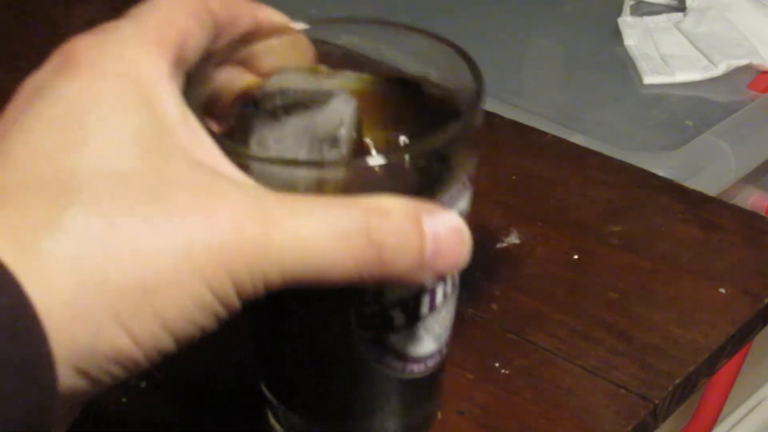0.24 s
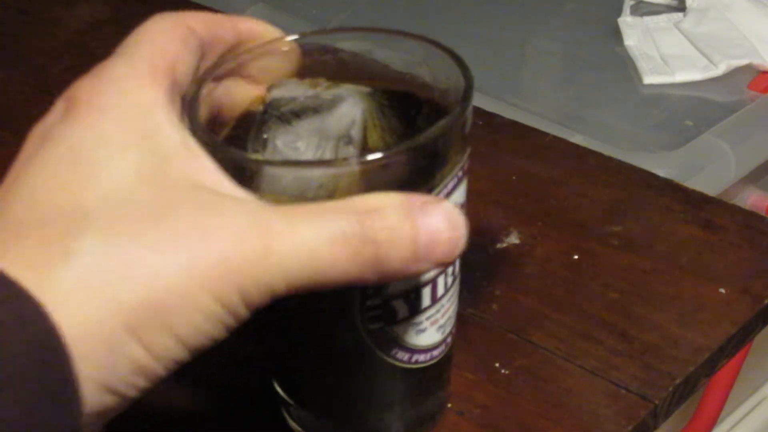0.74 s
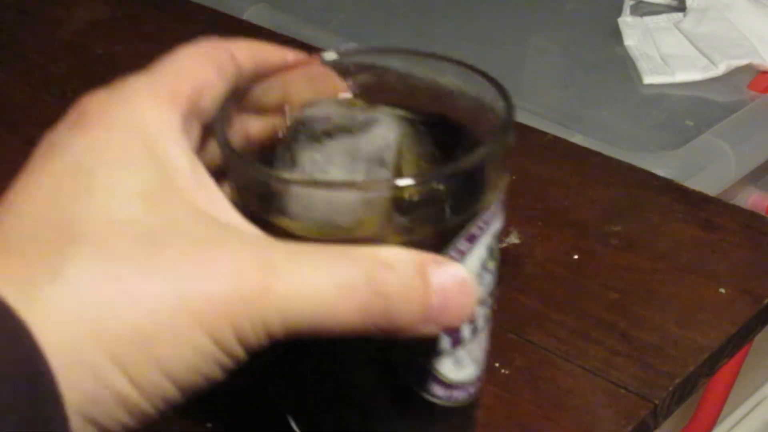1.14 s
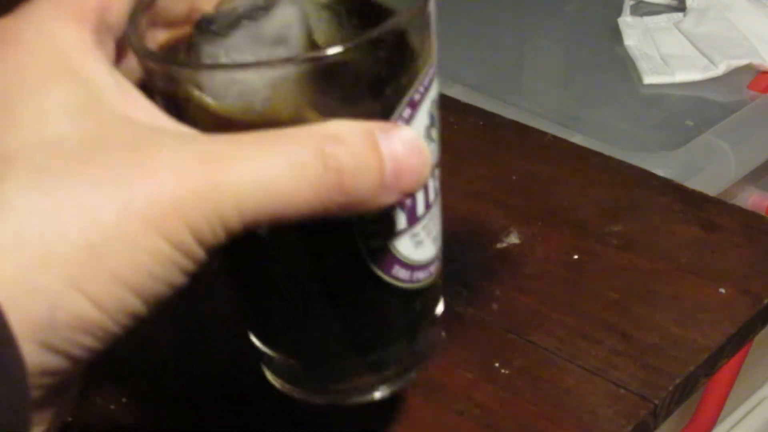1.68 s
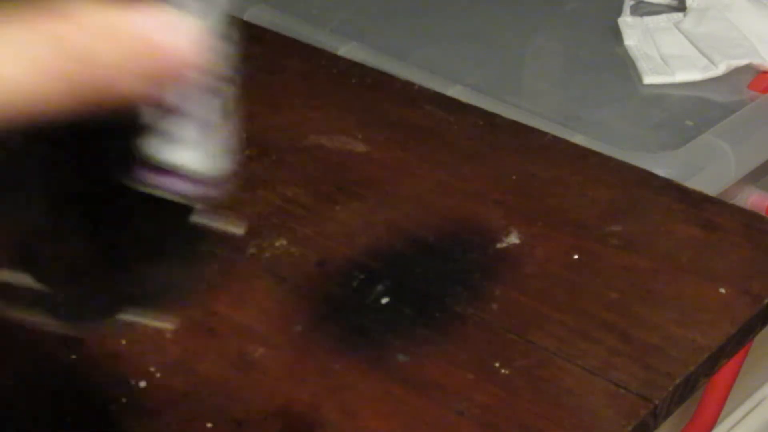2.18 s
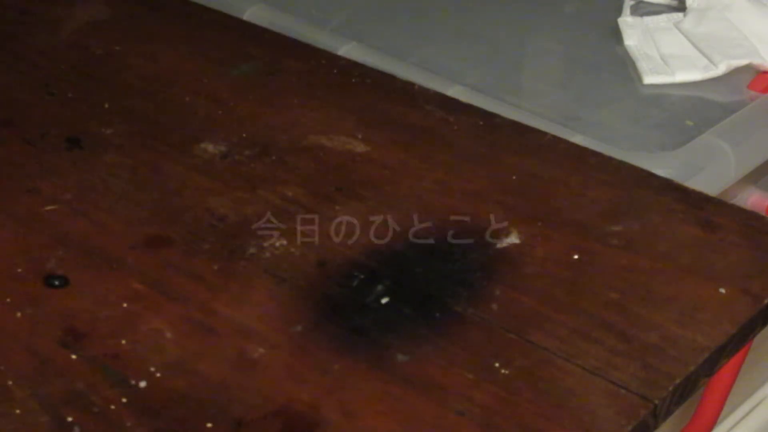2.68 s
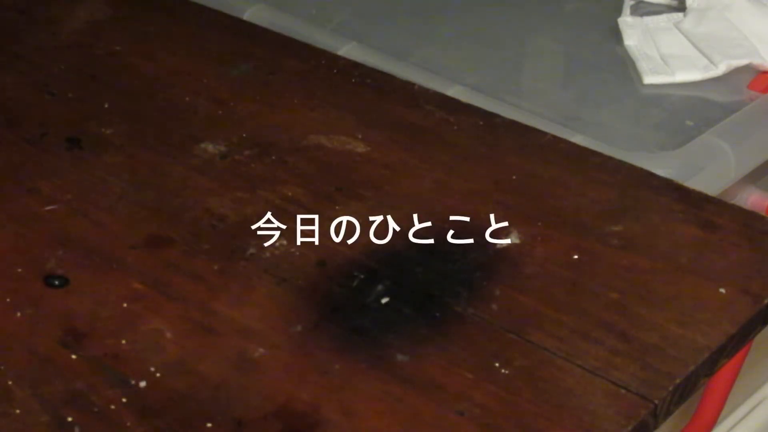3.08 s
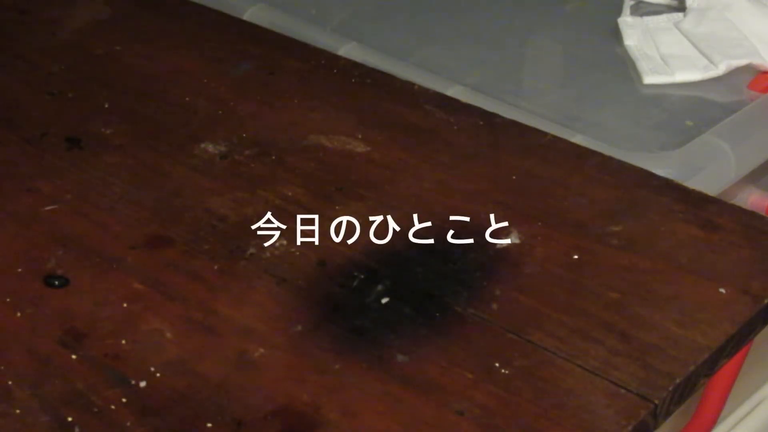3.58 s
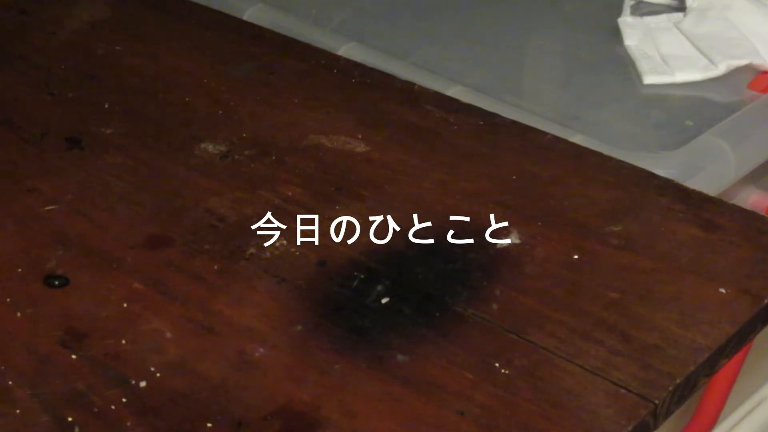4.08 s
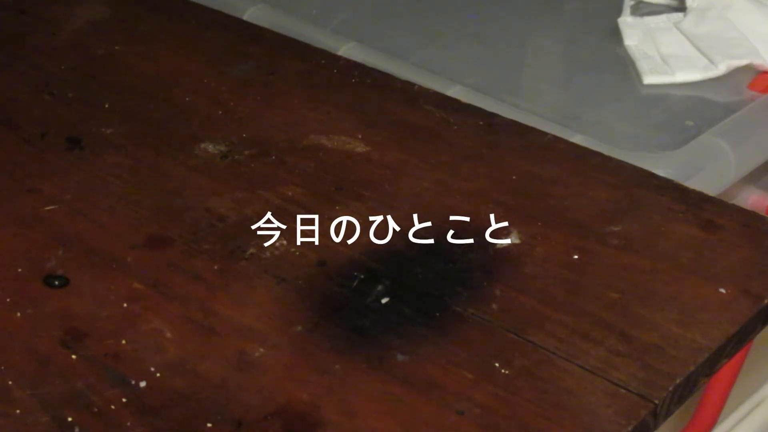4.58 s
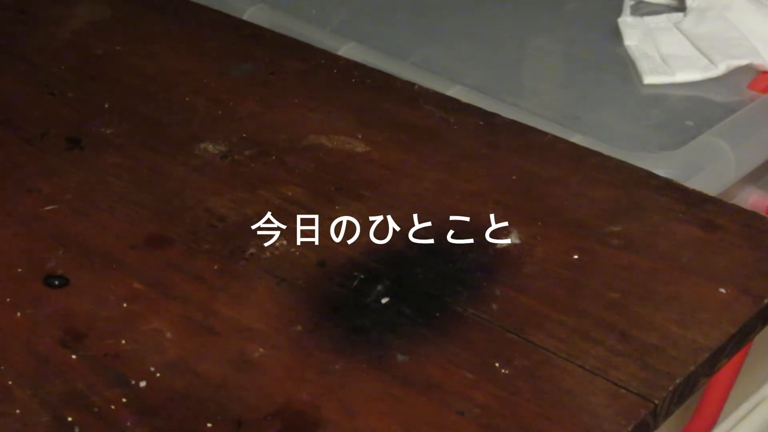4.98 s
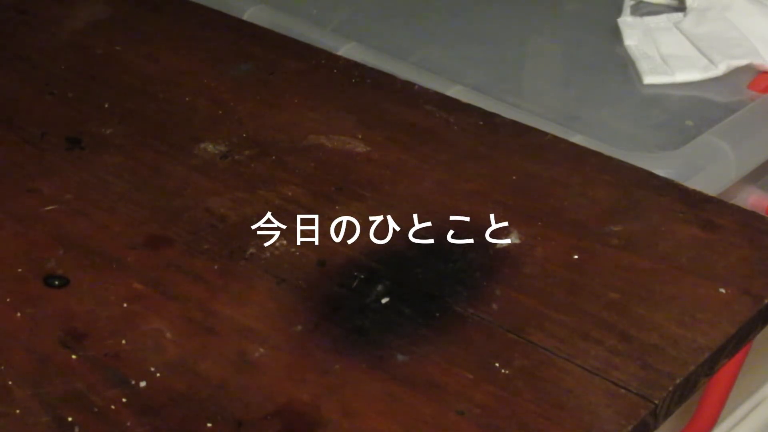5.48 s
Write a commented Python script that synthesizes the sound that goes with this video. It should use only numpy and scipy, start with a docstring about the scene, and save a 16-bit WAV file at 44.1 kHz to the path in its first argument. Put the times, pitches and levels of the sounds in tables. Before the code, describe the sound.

Very close to a small microphone, ice cubes clink briefly in a drinking glass, its heavy base bumps down on a wooden table, and after a short pause the ice rattles longer and louder as the glass is lifted. Then mostly a low motor hum, soft hiss and faint crackles in a small dry room, with one tiny clink and a clear double clink at the end.

```python
"""Ice cubes clink close by in a hand-held glass of drink while a motor hums: a rattle, the glass bumps a wooden
table, a longer rattle as it is lifted away, a faint clink later and a louder double one near the end. The ice and
glass are damped rings struck by a grinding contact, the table a set of wood modes. The motor, two sines, slowly
loses speed. Shaped noise makes the small room's rumble and hiss; short snaps crackle faintly, with a few soft taps
and a thin far ping."""
import sys
import numpy as np
from scipy import signal
from scipy.fft import rfft, irfft
from scipy.io import wavfile
from scipy.ndimage import uniform_filter1d, map_coordinates

SR = 44100
rng = np.random.default_rng(int(sys.argv[2]) if len(sys.argv) > 2 else 0)


def pcm_store(signal):
    """Save signal as 16-bit PCM."""
    levels = np.round(np.clip(np.atleast_2d(signal), -1, 1) * 32767)
    wavfile.write(sys.argv[1], SR, levels.astype(np.int16).T)


def gain_from_db(level_db):
    """Convert decibel levels to linear amplitude factors (20 dB per decade)."""
    decades = np.asarray(level_db, float) / 20
    return 10 ** decades


N = 253134  # length in samples


def unit(x):
    """Scaled to rms 1."""
    return x / np.sqrt(np.mean(x ** 2) + 1e-20)


def along(points, hz):
    """(Hz, value) points read on a log frequency axis."""
    f, v = np.transpose(points)
    return np.interp(np.log(hz + 1), np.log(f + 1), v)


def curves(rows):
    """One value per sample for each column after the time in seconds."""
    s, *cols = np.transpose(rows)
    return [np.interp(np.arange(N) / SR, s, c) for c in cols]


def wobble(rate):
    """A smooth random curve, rate knots a second."""
    knots = rng.standard_normal(int(N * rate / SR) + 4)
    return map_coordinates(knots, [np.arange(N) * rate / SR])


def add(track, s, sound):
    """Mix a sound into the track at time s."""
    part = track[round(s * SR):][:len(sound)]
    part += sound[:len(part)]


def ring(hz, db, t60, attack):
    """Sum of damped sines, a fifth of a second long; t60 and the attack's time constant in s."""
    t = np.arange(SR // 5) / SR
    hz, db, t60 = (np.reshape(v, (-1, 1)) for v in (hz, db, t60))
    sines = gain_from_db(db - 60 * t / t60) * np.sin(2 * np.pi * hz * t)
    return sines.sum(axis=0) * (1 - np.exp(-t / attack))


def contact(grind_db, t60):
    """A sharp blow followed by a short grinding shudder of the two surfaces."""
    t = np.arange(SR // 20) / SR
    force = gain_from_db(grind_db - 60 * t / t60) * rng.standard_normal(len(t))
    force[0] = 1
    return force


def clinks():
    """Each cube strikes another spot, so the ring families change strength; the sloshing drink shifts the low pair."""
    # Ice on glass. Each row: start in seconds, strength in dB, low ring in Hz, then the ice knock
    # and the upper rings in dB against the low ring family.
    strikes = [(0.0514, -26.5, 2270, 2.5, -21), (.0554, -20.5, 2300, -5, -12),
               (0.075, -21, 2080, -8.5, -12.5), (0.0825, -22, 1860, -9, -26), (0.091, -27, 2200, -5, -13),
               (0.1195, -23, 2200, -1.5, -12), (0.1702, -35, 2080, 6, -3), (.2189, -40, 2220, -7, -14),
               (0.2707, -24, 2150, -5, -9), (.2784, -24, 2210, -6.5, -22), (0.2912, -29.5, 2140, -12, -3),
               (0.2967, -36, 1900, 2, -18), (.3322, -28, 2170, -3.5, -11.5), (.3654, -41, 2080, -5, -8),
               (0.4553, -40.5, 2190, -4, -8), (1.0205, -40, 2207, -20, -6.5), (1.032, -37, 2000, -7, -6),
               (1.064, -26.5, 2150, -7.5, -13), (1.1051, -29.5, 2030, -8.5, -10),
               (1.1104, -30, 2180, -21, -10), (1.2261, -45, 2210, -14, -9), (1.278, -46, 2360, -12, -2),
               (1.328, -35, 2200, 0, -7), (1.3848, -43, 2360, -5, -1), (1.4005, -21.5, 2080, -11, -14.5),
               (1.4114, -36, 2260, -14, -19), (1.4488, -22.5, 2200, -5.5, -13),
               (1.464, -27, 2130, -11, -12), (1.4785, -27, 2120, -9, -13), (1.5032, -27.5, 2080, -6, -14),
               (1.521, -31, 2020, -6, -22), (1.544, -31, 2100, -6, -6), (1.57, -35, 2130, -12, -23),
               (1.5843, -25.5, 2080, -16, -14), (1.595, -32, 2080, -10, -12), (1.6162, -28, 2200, -6, -15),
               (1.6795, -24.5, 2200, -5, -18), (1.697, -43, 2000, -3, -4), (1.7116, -27, 2112, -10, -13),
               (1.73, -31, 2040, -10, -22), (1.739, -32, 2100, -20, -20), (1.744, -28, 2110, -4, -8),
               (1.7644, -25, 2140, -8, -19), (1.7706, -15.5, 2090, -10.5, -14.5),
               (1.7804, -32, 2060, -24, -22), (1.7864, -32, 2155, -16, -15), (1.7957, -37, 2261, -11, -11),
               (1.8362, -26, 2150, -20, -26), (1.8501, -12.5, 2140, -1, -5.5),
               (1.8575, -24, 2110, -20, -11), (1.8644, -32, 2070, -9, -2), (1.8795, -31, 2010, -8, -7),
               (1.892, -31, 2200, -13, -19), (1.8984, -33, 2070, -7, -12), (1.9146, -33, 2022, -7, -13),
               (1.9258, -26, 2150, -8, -15.5), (2.6919, -41, 2140, -3, -10), (5.5356, -22, 2290, -6.5, -14),
               (5.542, -32, 2420, -5, -26)]
    # The damped glass and its ice. Each row: mode in Hz, relative level in dB, t60 in seconds.
    glass_modes = [(1053, -20, 0.021), (1266, -18.5, 0.021), (1466, -15, 0.015), (1740, -12, 0.018),
                   (2080, 2, 0.018), (2200, -5.5, 0.022), (2576, 2, 0.013), (2804, 8.5, 0.0072),
                   (3073, 8.5, 0.0088), (3310, 4, 0.0058), (3560, 3, 0.012), (3810, -0.5, 0.0073),
                   (4080, -0.5, 0.014), (4710, 1, 0.0048), (4870, 6.5, 0.014), (5090, -1, 0.032),
                   (5350, -8, 0.012), (6200, 2.5, 0.0083), (6400, -25, 0.0112), (6800, -10, 0.016),
                   (7650, -13, 0.008), (8010, -7, 0.0099), (8000, -36, 0.011), (8800, -3, 0.012),
                   (8750, -10, 0.011), (11600, -17.5, .01)]
    # Ring families in Hz: low ring, low ice knock, high ice knock, upper rings (and all above).
    families_hz = [2150, 2950, 3900, 5000]
    high_knock_db, high_grows = -1, 1.94  # the high ice knock follows the low one, swinging wider
    hz, db, t60 = np.transpose(glass_modes)
    rows = np.vstack([strikes, nudges()])
    chance = rng.standard_normal((len(rows), 2, len(hz)))
    out = np.zeros(N)
    for (s, strength_db, low_hz, knock_db, upper_db), (level, detune) in zip(rows, chance):
        family_db = [0, knock_db, high_grows * knock_db + high_knock_db, upper_db]
        mode_db = db + strength_db + along(list(zip(families_hz, family_db)), hz)
        pitch = hz * (1 + .012 * detune)
        pitch[4:6] = hz[4:6] * low_hz / hz[4]  # the low pair moves together
        rings = ring(pitch, mode_db + 1.5 * level, t60, attack=.0004)
        add(out, s, signal.fftconvolve(rings, contact(grind_db=-25, t60=.025)))
    return out


def nudges():
    """The hand swirls the glass and cubes nudge the wall faintly: rows like those of the clinks, at random moments."""
    # Swirls of the glass. Each row: start in seconds, end in seconds.
    swirl_spans = [(.05, .47), (.98, 1.14), (1.19, 1.94)]
    per_s = 30
    s = np.concatenate([rng.uniform(a, b, round(per_s * (b - a))) for a, b in swirl_spans])
    size, slosh, knock, upper = rng.standard_normal((len(s), 4)).T
    strength_db = -48.5 + 4.5 * size
    low_hz = 2150 * (1 + 0.067 * slosh)
    return np.transpose([s, strength_db, low_hz, -7 + 4 * knock, -13 + 4 * upper])


def table_bumps():
    """The heavy base lands, rocks and bounces; a softer contact drives fewer high modes and a duller crunch."""
    # Glass base on the table top. Each row: start in seconds, blow in dB, softness corner in Hz (lower = softer).
    blows = [(.5640, -5.5, 1920), (0.569, -9.5, 890), (0.5755, -13, 814), (.6155, -19.5, 495),
             (0.622, -25.5, 780), (.631, -40, 493), (0.642, -41, 600)]
    # Table top modes. Each row: mode in Hz, relative level in dB.
    wood_modes = [(139, -14.5), (237, -18), (295, -8), (410, -5.5), (528, 4), (675, 2.5), (781, -5),
                  (951, -10), (1035, -6), (1110, -5), (1167, 1.5), (1297, 0.5), (1440, -12), (1696, -10),
                  (1970, -2), (2150, -8), (2370, -13), (2690, -6.5), (3036, -25), (3400, -18), (3900, -26)]
    hz, db = np.transpose(wood_modes)
    t60 = 0.059 * (500 / hz) ** 0.27  # wood damps its higher modes faster
    t = np.arange(SR // 10) / SR
    out = np.zeros(N)
    for s, blow_db, soft_hz in blows:
        soft_db = -20 * np.log10(1 + (hz / soft_hz) ** 2)
        rings = ring(hz, db + blow_db + soft_db, t60, attack=.0006)
        add(out, s, signal.fftconvolve(rings, contact(grind_db=-38, t60=.04)))
        dull = signal.butter(2, soft_hz, fs=SR, output="sos")
        crunch = signal.sosfilt(dull, rng.standard_normal(len(t)))
        add(out, s, gain_from_db(blow_db - 6 - 60 * t / 0.07) * crunch)
    return out


def motor():
    """A wavering hum that slowly sinks in pitch, with its octave coming and going."""
    # The hum swells and fades. Each row: time in seconds, rms level in dB before the waver.
    hum_level = [(0, -43.5), (.35, -40.5), (.55, -52), (.7, -43), (.95, -52), (1.25, -43.5), (1.5, -52.5),
                 (1.79, -44), (2.56, -40.5), (2.88, -45), (3.55, -39.5), (4.04, -36), (4.3, -39),
                 (4.47, -49), (4.62, -39), (5.1, -42.5), (5.74, -38)]
    # Swells of the octave. Each row: start in seconds, length in seconds, level in dB added to the resting octave.
    octave_swells = [(0, 0.87, -60.5), (1.3, 1.43, -53), (2.905, 0.41, -52.5), (3.6, 0.675, -55),
                     (4.917, 0.82, -56)]
    start_hz, sag_hz_per_s = 117.24, 1.02
    rest_db, edge_s = -63, 0.18  # octave between swells, and the ramp at each swell's ends
    t = np.arange(N) / SR
    hum_db, = curves(hum_level)
    octave = gain_from_db(rest_db)
    for s, length, db in octave_swells:
        octave = octave + gain_from_db(db) * np.clip(np.minimum(t - s, s + length - t) / edge_s, 0, 1)
    turn = 2 * np.pi * np.cumsum(start_hz - sag_hz_per_s * t + 0.28 * wobble(5.1)) / SR
    waver_db = .8 * np.array([wobble(9), wobble(9)])
    low = gain_from_db(hum_db + waver_db[0]) * np.sin(turn)
    high = octave * gain_from_db(waver_db[1]) * np.sin(2 * turn + 0.59)
    return np.sqrt(2) * (low + high)


def small_sounds():
    """Soft low taps, each one damped sine, and a thin shivering ping somewhere in the room."""
    # Soft low taps. Each row: start in seconds, level in dB, pitch in Hz.
    soft_taps = [(4.355, -39, 1020), (4.976, -35.5, 970), (5.563, -34, 458), (5.614, -35.5, 433),
                 (5.675, -33, 446)]
    # Rings of the far ping. Each row: pitch in Hz, level in dB, t60 in seconds.
    ping_modes = [(6670, -39, 0.1), (6350, -38, 0.0474), (7000, -44, .06), (4390, -47, 0.07),
                  (4395, -51, 0.055)]
    ping_s = 2.679
    out = np.zeros(N)
    for s, db, hz in soft_taps:
        add(out, s, ring(hz, db, 0.019, attack=0.00072))
    rings = ring(*np.transpose(ping_modes), attack=0.0031)
    add(out, ping_s, signal.fftconvolve(rings, contact(grind_db=-26.0, t60=0.12)))
    return out


def crackle(count=700):
    """Tiny snaps of a cycle or two with a noise burst: the loud ones listed, a faint patter at random."""
    # The loudest crackles. Each row: start in seconds, level in dB, centre in Hz.
    loud_snaps = [(0.1274, -28, 3310), (0.2324, -36, 7490), (0.6634, -32, 7040), (0.9857, -36.5, 3300),
                  (1.6244, -31, 2570), (2.0014, -36, 2820), (2.5366, -36, 2810), (3.0505, -34.5, 7150),
                  (3.1248, -34.5, 3020), (3.1334, -34.5, 1510), (3.3428, -36.5, 8010),
                  (3.5009, -34.5, 8070), (3.894, -35, 8110), (4.1889, -39, 6400), (4.3705, -37.5, 2940),
                  (5.02, -35, 6300), (5.219, -35, 3140), (5.2984, -34.5, 2720)]
    draw = rng.random((count, 3))
    faint_db = -52 + 15 * draw[:, 1] ** 3
    faint = np.transpose([draw[:, 0] * N / SR, faint_db, 2500 * 5 ** draw[:, 2]])
    s, db, hz = np.vstack([loud_snaps, faint]).T[:, :, None]
    k = np.arange(256)  # samples of one snap
    snaps = gain_from_db(db) * np.exp(-k * hz / SR / 1.3) * np.sin(2 * np.pi * hz * k / SR)
    snaps += gain_from_db(db - 2) * np.exp(-k / SR / 0.002) * rng.standard_normal(snaps.shape)
    place = np.round(s * SR).astype(int) + k
    return np.bincount(place.ravel(), snaps.ravel(), N + 256)[:N]


def rush(spectrum, patchy_db):
    """Coloured noise of rms 1 with patches of random gain over time and frequency."""
    _, _, z = signal.stft(rng.standard_normal(N + 512), SR, nperseg=512)
    field = uniform_filter1d(rng.standard_normal(z.shape), size=30, axis=0)
    field = uniform_filter1d(field, size=3, axis=1)
    patched = signal.istft(z * gain_from_db(patchy_db * unit(field)), SR, nperseg=512)[1][:N]
    colour = gain_from_db(along(spectrum, np.fft.rfftfreq(N, 1 / SR)))
    return unit(irfft(rfft(patched) * colour, N))


def air():
    """Low rumble, a steady mid hiss and a treble hiss that flickers fast, all shaped noise."""
    # Spectra of the rumble, the mid hiss and the treble hiss. Each row: frequency in Hz, relative density in dB.
    rumble_colour = [(15, -57), (25, 11), (59, -11), (84, -6.5), (113, -5), (162, -5), (400, -21),
                     (520, -62), (880, -120)]
    hiss_colour = [(150, -52), (250, -8), (260, -9.5), (294, -8.5), (640, -9.5), (980, -7.5), (1320, -9),
                   (5000, -19.5), (6500, -42), (11000, -120)]
    fizz_colour = [(2500, -39), (4000, -44), (5500, 2), (8500, 1.5), (12000, -3), (14900, -6), (15300, -47),
                   (16500, -120)]
    # Room hiss. Each row: time in seconds, mid hiss rms in dB before its wobble.
    hiss_level = [(0, -49.5), (.6, -51.5), (1.7, -50.5), (2.1, -51), (2.65, -48), (3.0, -50.5),
                  (3.7, -51.5), (4.75, -51.5), (5.74, -50)]
    hiss_db, = curves(hiss_level)
    rumble = gain_from_db(-46 + 0.97 * wobble(2.34)) * rush(rumble_colour, patchy_db=1.45)
    hiss = gain_from_db(hiss_db + 0.54 * wobble(5.29)) * rush(hiss_colour, patchy_db=1.01)
    flicker_db = 1.3 * wobble(40) + .3 * wobble(7)
    fizz = gain_from_db(hiss_db - 5.0 + flicker_db) * rush(fizz_colour, patchy_db=1.6)
    return rumble + hiss + fizz


def room(x):
    """Each frequency of the tail dies at its own speed; a new tail for every tenth of a second."""
    # Decay of the small room. Each row: frequency in Hz, t60 in seconds.
    room_decay = [(300, 0.085), (2000, 0.082), (10000, 0.021)]
    out, step = np.zeros(N), SR // 10
    for start in range(0, N, step):
        hz, t, z = signal.stft(rng.standard_normal(SR // 4), SR, nperseg=128)
        decay = gain_from_db(-60 * t / along(room_decay, hz)[:, None])
        tail = signal.istft(z * decay, SR, nperseg=128)[1]
        wet = signal.fftconvolve(x[start:start + step], tail / np.linalg.norm(tail))
        add(out, start / SR + .003, wet)  # the tail starts 3 ms late
    return out


def scene():
    """Near sounds with their room, over the background."""
    small = signal.butter(2, 1100, "highpass", fs=SR, output="sos")  # a glass is too small to radiate lows
    distant = signal.butter(2, 14000, fs=SR, output="sos")  # air takes the top off far snaps
    glass, wood = signal.sosfilt(small, clinks()), table_bumps()
    far = small_sounds() + signal.sosfilt(distant, crackle())
    wet = room(gain_from_db(-16) * glass + gain_from_db(-14) * wood + gain_from_db(-6.5) * far)  # far sounds send most to the room
    return (glass + wood + far + wet + motor() + air())[None]


def top_cut(x):
    """Nothing passes above the cut-off."""
    return signal.sosfilt(signal.butter(12, 15990, fs=SR, output="sos"), x)


def record(dry):
    """A small microphone drops the deepest bass, its preamp rounds off the peaks; a sharp band limit ends at 15 kHz."""
    low_cut = signal.butter(3, 70, "highpass", fs=SR, output="sos")
    band_limit = signal.ellip(10, .5, 70, 15050, fs=SR, output="sos")
    x = signal.sosfilt(band_limit, signal.sosfilt(low_cut, dry))
    rounded = x / (1 + np.abs(x / 0.7) ** 4) ** (1 / 4)  # never passes 0.7
    return top_cut(rounded)


dry = scene()
out = record(dry)
pcm_store(out)
```